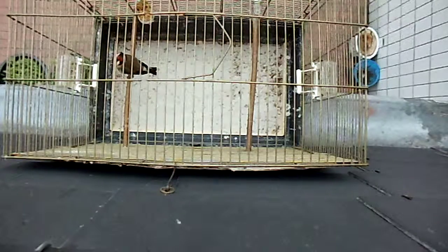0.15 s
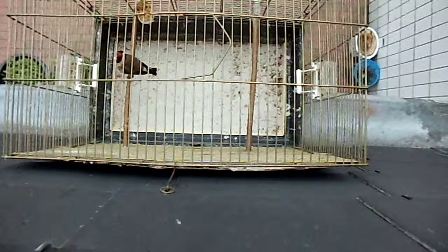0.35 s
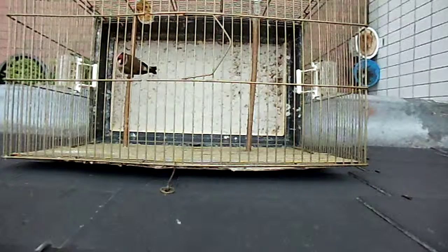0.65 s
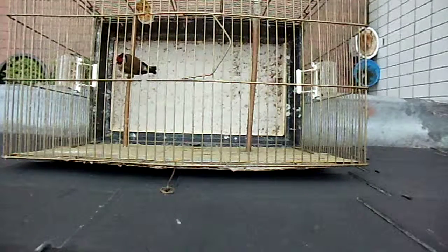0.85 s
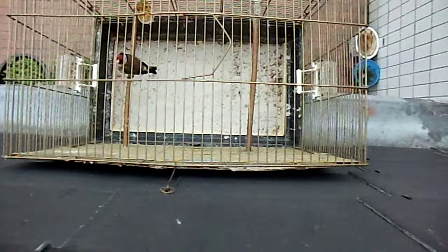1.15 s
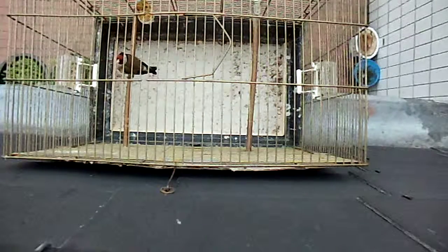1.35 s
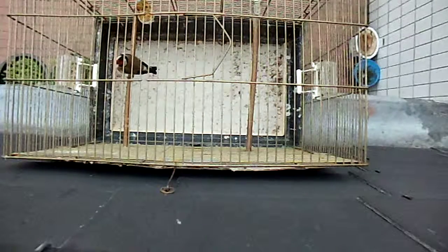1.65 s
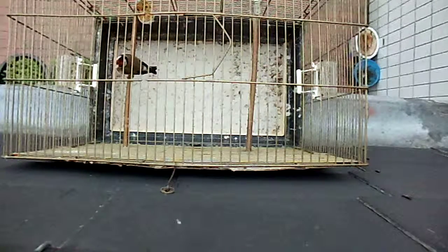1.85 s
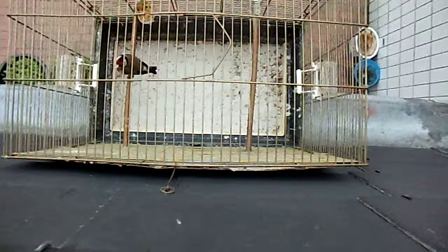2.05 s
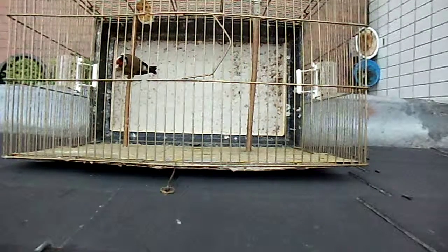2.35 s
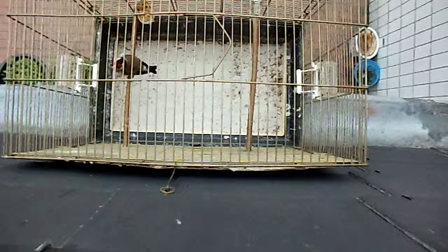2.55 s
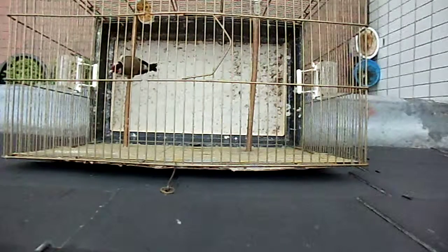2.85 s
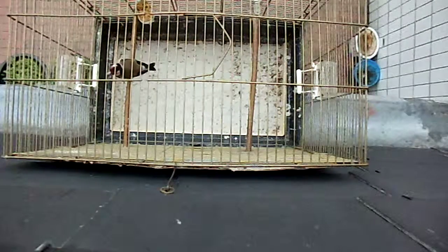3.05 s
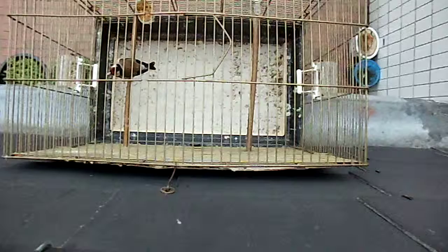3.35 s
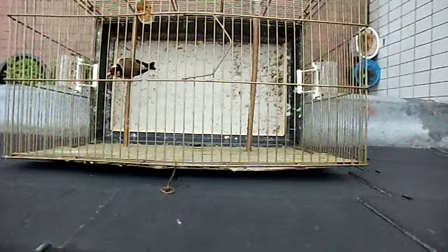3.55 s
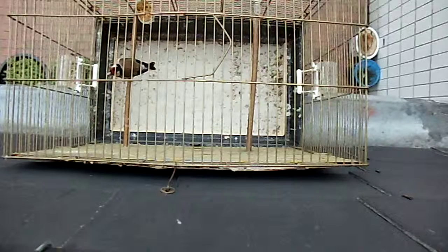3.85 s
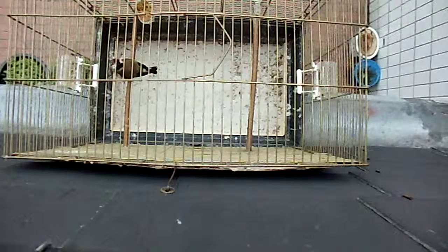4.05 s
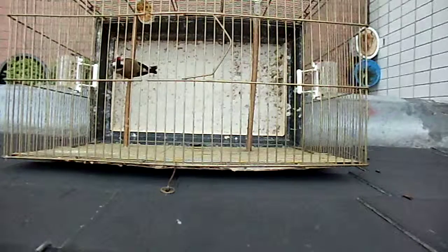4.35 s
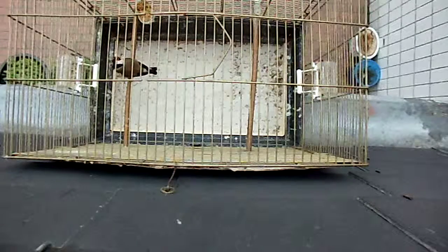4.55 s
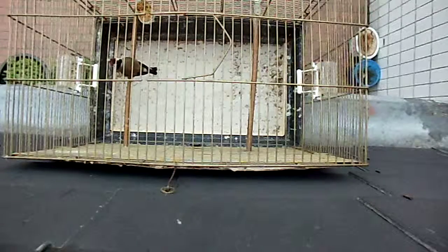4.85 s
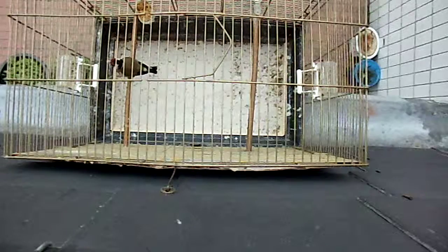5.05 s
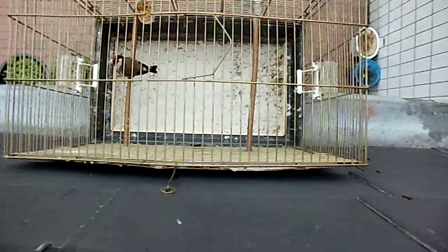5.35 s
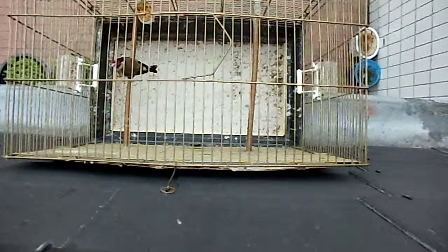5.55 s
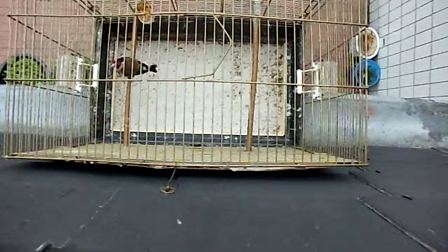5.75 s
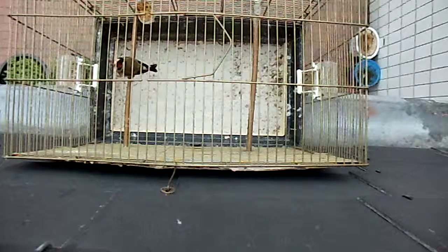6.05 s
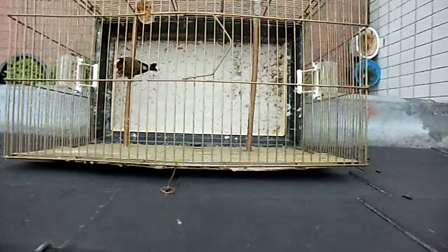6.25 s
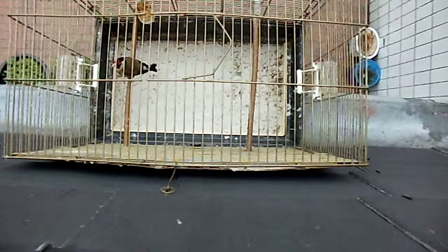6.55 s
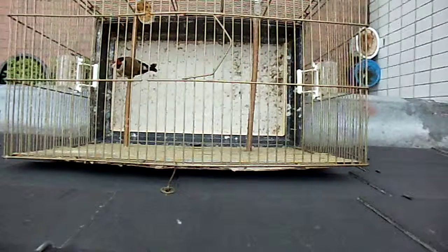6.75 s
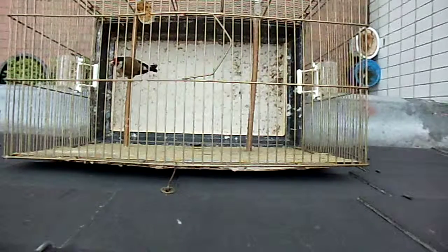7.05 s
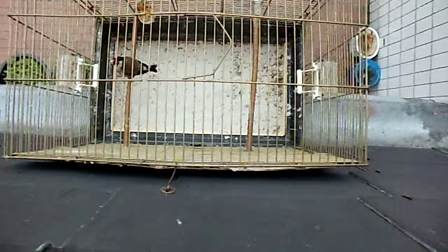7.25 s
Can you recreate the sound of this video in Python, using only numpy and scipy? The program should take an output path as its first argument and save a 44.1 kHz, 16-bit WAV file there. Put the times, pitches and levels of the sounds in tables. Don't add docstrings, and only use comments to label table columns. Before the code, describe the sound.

A caged finch sings falling whistled slides, pauses, then a rapid twittering phrase, more slides, a warble and a trill over distant traffic rumble.

```python
import sys
import numpy as np
from scipy import signal
from scipy.fft import rfft, irfft, next_fast_len
from scipy.io import wavfile
from scipy.ndimage import uniform_filter1d

SR = 44100
rng = np.random.default_rng(int(sys.argv[2]) if len(sys.argv) > 2 else 0)


def file_out(sig):
    cols = np.atleast_2d(sig).T
    lim = np.clip(cols, -1, 1)
    pcm = np.round(lim * 32767).astype(np.int16)
    wavfile.write(sys.argv[1], SR, pcm)


def rack_gain(trim_db):
    fader = np.asarray(trim_db, float)
    return 10 ** (fader / 20)


N = 325891


def evened(x):
    return x / np.sqrt(np.mean(x ** 2) + 1e-20)


def read(points, hz):
    f, value = np.transpose(points)
    return np.interp(np.log(hz + 1), np.log(f + 1), value)


def coloured(x, points):
    size = next_fast_len(len(x))
    gain = rack_gain(read(points, np.fft.rfftfreq(size, 1 / SR)))
    return irfft(rfft(x, size) * gain, size)[:len(x)]


def along(rows):
    s, db = np.transpose(rows)
    return rack_gain(np.interp(np.arange(N) / SR, s, db))


def spans(rows, rest):
    out = np.full(N, float(rest))
    for start, end, value in rows:
        out[int(start * SR):int(end * SR)] = value
    return out


def town(patchy_db=1.1, level_db=2.0):
    # (frequency [Hz], density [dB per Hz])
    wash_spectrum = [(35, -47), (60, 4.5), (87, -2.5), (143, -4), (297, -8), (432, -11), (486, -9),
                     (614, -14), (874, -10.5), (1370, -18), (2900, -22), (3500, -28.5), (4320, -29),
                     (15000, -56.5), (16500, -32)]
    # (time [s], level [dB])
    wash_level = [(0.0, -59.5), (1.13, -58.5), (1.6, -60), (2.7, -62), (2.85, -58.5), (3.0, -60.5),
                  (3.2, -60.5), (4.09, -63.5), (4.77, -65.5), (5.62, -64), (7.39, -64.5)]
    frames = N // 256 + 5
    a, b, patches = rng.standard_normal((frames, 513, 3)).T
    patches = uniform_filter1d(patches, size=10, axis=0)
    patches = evened(uniform_filter1d(patches, size=14, axis=1))
    z = (a + 1j * b) * rack_gain(patchy_db * patches)
    wash = signal.istft(z, nperseg=1024, noverlap=768)[1][:N]
    return rack_gain(level_db) * evened(coloured(wash, wash_spectrum)) * along(wash_level)


def rumble():
    # (frequency [Hz], density [dB per Hz])
    throb_spectrum = [(7.1, -37), (12, 3), (18, -3), (24, -4), (48, -4), (60, -25), (86, -18.5),
                      (110, -19.5), (140, -46), (240, -120)]
    # (time [s], level [dB])
    throb_level = [(0.0, -52.5), (0.6, -56.5), (1.5, -59), (2.3, -57), (2.86, -56), (3.21, -53.5),
                   (3.5, -55.5), (5.99, -57.5), (6.24, -58.5), (6.48, -52), (6.8, -61), (7.39, -57)]
    low = evened(coloured(rng.standard_normal(N), throb_spectrum))
    lumps = np.sqrt(uniform_filter1d(low ** 2, size=6000))
    return low / (lumps + 0.33) * rack_gain(4.5) * along(throb_level)


def engine():
    # (time [s], pitch [Hz], level [dB])
    firing = [(3.75, 43.2, -56), (5.472, 42.44, -54.5), (5.66, 43.2, -57), (5.95, 45.44, -80),
              (6.1, 45.84, -53.5), (6.49, 49.6, -49), (6.71, 49.5, -60), (6.96, 53, -55),
              (7.39, 59.4, -57.5)]
    s, hz, db = np.transpose(firing)
    t = np.arange(N) / SR
    fade_in = np.clip((t - s[0]) / 0.12, 0, 1)
    phase = 2 * np.pi * np.cumsum(np.interp(t, s, hz)) / SR
    return np.sqrt(2) * fade_in * rack_gain(np.interp(t, s, db)) * np.sin(phase)


def wobble():
    # (start [s], end [s], wobble [rad])
    unsteady = [(0, .72, .36), (.72, 3.85, .3), (3.87, 3.92, .35), (4.11, 4.14, 1.0), (4.14, 4.32, .16),
                (4.55, 4.6, .2), (4.9, 5.03, .2), (5.03, 5.1, .3), (5.11, 5.19, .06), (5.22, 5.25, .6),
                (5.35, 6.26, .33), (6.43, 6.48, .25), (6.85, 7.39, .07)]
    low_pass = signal.butter(4, 300, fs=SR, output="sos")
    sway = evened(signal.sosfilt(low_pass, rng.standard_normal((2, N))))
    sway = sway * spans(unsteady, .04)
    return np.exp(1j * sway[0] + .8 * np.clip(sway[1], -2, .8))


def add(voice, rows, fade_s=0.0011, round_s=.003):
    # (start [s], end [s], rate [quavers per s], swing [Hz], highest quavering tone [Hz])
    quavers = [
        (5.0289, 5.09, 140, 720, 6900),
        (6.578, 6.615, 110, 60, 9500),
        (6.615, 6.808, 97, 175, 9500),
    ]
    s, hz, db = np.transpose(rows)
    at = np.arange(max(int(s[0] * SR), 0), min(int(s[-1] * SR), N))
    t = at / SR
    hz = uniform_filter1d(np.interp(t, s, hz), int(round_s * SR), mode="nearest")
    for start, end, rate, swing, top in quavers:
        inside = np.clip(np.minimum(t - start, end - t) / 0.0057, 0, 1)
        beat = 2 * np.pi * rate * (t - start)
        quaver = np.sin(beat) - .3 * np.sin(2 * beat) + .2 * np.cos(2 * beat)
        hz = hz + swing * inside * (hz > 4000) * (hz < top) * quaver
    edge = np.clip(np.minimum(t - s[0], s[-1] - t) / fade_s, 0, 1)
    size = np.sqrt(2) * rack_gain(np.interp(t, s, db)) * edge
    turn = np.exp(2j * np.pi * np.cumsum(hz) / SR)
    voice[:, at] += [size * turn, size, size * hz, size * turn ** 2, (size * turn) ** 2]


def far_birds():
    # (start [s], length [s], from [Hz], to [Hz], level [dB])
    calls = [(0.759, 0.019, 3610, 4220, -53.5), (0.896, 0.035, 4370, 4020, -68),
             (1.152, 0.026, 2590, 3190, -59), (1.16, 0.014, 5900, 6100, -71),
             (1.19, 0.034, 4770, 4450, -68.5), (1.268, 0.03, 3200, 3180, -66.5),
             (1.3, .08, 3180, 3200, -72), (1.27, .015, 6150, 6300, -76), (1.21, .025, 4100, 4350, -74),
             (1.25, .035, 4400, 4750, -75), (1.89, .06, 2950, 2900, -76), (1.57, 0.019, 4650, 4800, -77),
             (1.871, 0.019, 2620, 3020, -67.5), (1.179, .075, 3080, 3050, -70),
             (2.37, 0.09, 5250, 4900, -83), (2.96, 0.1, 5350, 5500, -85), (3.275, .05, 5080, 4450, -76),
             (3.505, 0.025, 2530, 2920, -71), (3.525, 0.044, 2900, 2860, -76),
             (3.722, 0.034, 4850, 4400, -69)]
    voice = np.zeros((5, N), complex)
    for s, length, from_hz, to_hz, db in calls:
        middle_hz = .42 * from_hz + .58 * to_hz
        rows = [(s, from_hz, db - 6), (s + length / 2, middle_hz, db), (s + length, to_hz, db + 1)]
        add(voice, rows, fade_s=0.0018)
    return (voice[0] * wobble()).real


def yard(x, onset_s=0.0074):
    # (frequency [Hz], t60 [s])
    decay_time = [(2000, 0.47), (4000, 0.52), (6000, 0.56), (9000, 0.19), (14000, 0.096)]
    # (frequency [Hz], level [dB])
    tail_level = [(2000, -22.5), (3200, -16), (4300, -14), (5200, -16), (6500, -22.5), (7500, -28),
                  (9000, -28), (14000, -36)]
    taps = np.zeros(SR)
    at = np.arange(0, SR - 8, 8) + rng.integers(0, 8, (SR - 1) // 8)
    taps[at] = rng.choice([-1., 1.], at.shape)
    hz, t, z = signal.stft(taps, SR, nperseg=128)
    decay = rack_gain(-60 * t / read(decay_time, hz)[:, None])
    energy = (decay ** 2).sum(1, keepdims=True) * 64 / 8
    decay *= rack_gain(read(tail_level, hz))[:, None] / np.sqrt(energy)
    tail = signal.istft(z * decay, SR, nperseg=128)[1]
    return signal.fftconvolve(x, np.r_[np.zeros(int(onset_s * SR)), tail])[:N]


def near_walls(x, cage=.85, walls=1.35, dull_hz=6300):
    # (delay [ms], gain [ratio])
    echoes = [(0.658, -0.1), (0.726, 0.33), (0.907, 0.16), (1.202, -0.16), (1.406, 0.45), (1.542, -0.16),
              (2.222, -0.24), (2.404, -0.16), (2.812, 0.16), (2.993, 0.1), (3.447, 0.24), (4.082, -0.24),
              (5.011, -0.16), (5.079, 0.1), (6.304, 0.1), (6.689, -0.16), (6.848, 0.1), (8.141, -0.1),
              (8.866, -0.16), (9.478, 0.1), (10.317, -0.16), (10.476, -0.1), (10.726, -0.1), (12.018, 0.1)]
    lean_ms, turns_per_s = .06, .55
    taps = np.zeros((4, 1024))
    taps[0, 0] = 1
    for k, (ms, gain) in enumerate(echoes):
        if ms < 4.5:
            taps[0, round(ms * SR / 1000)] += gain * cage
        else:
            shift = lean_ms * np.sin(2.4 * k + 2.1 * np.arange(3))
            taps[[1, 2, 3], np.round((ms + shift) * SR / 1000).astype(int)] += gain * walls
    taps[1:] = signal.filtfilt(*signal.butter(3, dull_hz, fs=SR), taps[1:])
    head = 2 * np.pi * (turns_per_s * np.arange(N) / SR + np.arange(3)[:, None] / 3)
    share = np.vstack([np.ones(N), np.sqrt(2 / 3) * np.cos(head / 2)])
    heard = signal.oaconvolve(x * share, taps, axes=1).sum(0)[:N]
    return heard / np.linalg.norm(taps[:2])


def tray(x):
    # (frequency [Hz], t60 [s], level [dB])
    modes = [(2920, .09, -39), (3400, 0.16, -7), (3800, 0.09, -27), (4400, 0.2, -6), (4234, 0.1, 8),
             (4650, 0.18, -25), (5080, 0.057, 1.5)]
    t = np.arange(8000) / SR
    ring = np.zeros(8000)
    for hz, t60, db in modes:
        mode_gain = 2 * np.log(1000) / (t60 * SR)
        ring += rack_gain(db - 60 * t / t60) * np.sin(2 * np.pi * hz * t) * mode_gain
    return signal.oaconvolve(x, ring)[:N]


def glide(note, shape, sag):
    start, length, from_hz, to_hz, peak_db = note
    bend, arrive, top, start_db, end_db = shape
    u = np.linspace(0, 1, num=32)
    arrive, top = min(arrive, .999), np.clip(top, .05, .95)
    hz = to_hz + (from_hz - to_hz) * np.clip(1 - u / arrive, 0, 1) ** bend
    hz *= 1 - sag * np.clip(u - arrive, 0, 1)
    swell, fade = start_db * (1 - u / top) ** 2, end_db * ((u - top) / (1 - top)) ** 2
    db = peak_db + np.where(u < top, swell, fade)
    return np.transpose([start + length * u, hz, db])


def winding_notes(voice):
    # (time [s], pitch [Hz], level [dB])
    hook = [(3.953, 2690, -50), (3.965, 2920, -40), (3.978, 3400, -38.5), (3.987, 4880, -33),
            (4.004, 5830, -59)]
    tumble = [(4.236, 8650, -53), (4.241, 7100, -38), (4.246, 7530, -35), (4.252, 7200, -56),
              (4.266, 5170, -47), (4.276, 4710, -35), (4.29, 4310, -52), (4.296, 3800, -30),
              (4.306, 3600, -36)]
    swoop = [(4.6, 6060, -39), (4.615, 6266, -30), (4.636, 5860, -45), (4.654, 5640, -52.5),
             (4.666, 5210, -22.5), (4.69, 5006, -32.5), (4.736, 5050, -48)]
    buzz = [(5.037, 6100, -44), (5.041, 5950, -36), (5.069, 5900, -27.5), (5.087, 5950, -33)]
    buzz_tail = [(5.08, 6950, -40), (5.086, 7050, -34), (5.097, 7250, -36), (5.107, 7900, -54)]
    dive = [(5.117, 4520, -55), (5.129, 4060, -46), (5.133, 3830, -29), (5.148, 3250, -33.5),
            (5.159, 2900, -29.5), (5.165, 2680, -43), (5.189, 2230, -55)]
    lift = [(6.441, 3100, -46), (6.446, 3600, -36), (6.452, 3900, -39), (6.458, 4150, -35),
            (6.465, 4400, -38), (6.47, 4400, -50)]
    clamber = [(4.938, 3300, -46), (4.942, 3850, -36), (4.947, 4350, -33), (4.956, 4700, -34),
               (4.975, 5180, -39), (4.99, 5450, -44), (4.995, 5450, -58)]
    warble = [(6.577, 8800, -54), (6.589, 8370, -43), (6.612, 8450, -41), (6.638, 7570, -34),
              (6.66, 6440, -30.5), (6.7, 6095, -31), (6.76, 5830, -32.5), (6.8, 6103, -27),
              (6.819, 6070, -54)]
    for rows in (hook, tumble, swoop, buzz, buzz_tail, dive, lift, clamber, warble):
        add(voice, rows)


def simple_notes(voice):
    # (start [s], length [s], from [Hz], to [Hz], peak level [dB])
    flicks = [(3.871, 0.033, 2870, 5650, -40), (4.359, 0.022, 5580, 6820, -33.5),
              (4.477, 0.019, 2710, 3220, -31), (4.901, 0.017, 2180, 4000, -39),
              (5.227, 0.033, 2380, 4830, -39.5), (5.227, 0.017, 5000, 7120, -33),
              (5.246, 0.02, 4400, 5400, -39), (6.432, 0.014, 1900, 4500, -41),
              (4.912, .026, 2600, 3400, -46), (4.766, .012, 2150, 2650, -52),
              (5.226, .012, 2000, 3000, -52), (4.143, .02, 2150, 2530, -50),
              (4.197, 0.0184, 4200, 4650, -39.5), (4.774, .022, 2590, 3240, -36.5)]
    climbs = [(3.878, 0.038, 3200, 4800, -66), (4.556, 0.039, 3600, 5540, -32),
              (4.572, 0.048, 4750, 5230, -43), (4.96, 0.04, 4700, 5030, -41.5)]
    swells = [(4.169, .03, 2550, 3070, -35), (4.177, 0.024, 3750, 4000, -40),
              (4.214, 0.026, 4180, 4550, -37), (4.79, .025, 3210, 3950, -30.5)]
    falls = [(4.107, 0.028, 5120, 1810, -41), (4.12, 0.022, 3000, 1450, -52), (4.112, .03, 6000, 3000, -44),
             (4.24, .006, 7500, 5600, -48), (4.256, .022, 3820, 3500, -46), (4.275, .03, 3490, 2770, -38.5),
             (4.858, .03, 6460, 5580, -35), (5.029, .009, 8000, 7100, -53)]
    settles = [(4.009, 0.028, 6520, 6096, -29), (4.078, 0.037, 5500, 5120, -28.5),
               (4.151, 0.013, 3430, 3780, -37), (4.695, 0.025, 4200, 4260, -53),
               (4.92, .022, 6600, 6450, -52), (6.787, .02, 3030, 3220, -49)]
    snaps = [(4.361, 0.069, 4730, 5740, -36), (4.858, 0.05, 8400, 6500, -34.5),
             (5.245, 0.033, 5430, 6340, -28.5)]
    arches = [(6.359, .052, 5000, 6670, -40), (6.353, 0.058, 2800, 5560, -43)]
    # (glide bend [exponent], glide end [share of length], peak [share of length],
    # start level [dB], end level [dB])
    shapes = [
        (1.3, 1, 0.65, -12.5, -16),
        (2.3, 0.94, 0.29, -9.5, -33),
        (1.2, 0.937, 0.74, -16, -16),
        (1.3, 0.96, 0.38, -26, -32),
        (2.84, .999, 0.48, -23, -11),
        (2.6, .5, 0.29, -9.5, -11.5),
        (2, .42, 0.58, -17, -16),
    ]
    sags = [0.012, 0, 0, 0.0058, 0, 0.038, 0.142]
    kinds = (flicks, climbs, swells, falls, settles, snaps, arches)
    for notes, shape, sag in zip(kinds, shapes, sags):
        for note in notes:
            add(voice, glide(note, shape, sag))


def finch():
    # (time [s], pitch [Hz], level [dB])
    slide = [
        [(.002, 6100, -41.5), (.006, 7440, -30.5), (.012, 9600, -39)],
        [(.013, 6950, -52), (.026, 6220, -32.5), (.04, 5180, -32), (.05, 4574, -29.5), (.07, 3964, -29.5),
         (.096, 3240, -32.5), (.116, 2760, -35.5), (.128, 2440, -48.5), (.146, 2270, -58)],
    ]
    trill = [
        [(.005, 4240, -53), (.0102, 3910, -41.5), (.0122, 3795, -31), (.019, 3290, -37.5), (.025, 3013, -32.5),
         (.029, 2910, -44)],
        [(.034, 4490, -49), (.039, 4780, -33), (.052, 5353, -32), (.055, 5420, -50)],
    ]
    # (start [s], effort [dB], length [factor], pitch [factor])
    slide_times = [(-.032, -3, 1.02, 1.003), (.169, -3.5, 1.054, 0.97), (0.376, -3, 0.95, 1.002),
                   (.564, -3.5, 0.98, 0.98), (5.333, -2.5, 1.006, 1), (5.528, -3, 0.96, 0.99),
                   (5.716, -3, 1.0, 0.99), (5.914, -3, 0.98, 0.99), (6.107, -4, 1.026, 0.99)]
    trill_times = [(6.8612, -0.93, 0.86, 0.99), (6.931, -0.75, 0.95, 1), (7.0026, -0.097, 0.92, .99),
                   (7.0723, -.3, 0.95, 0.98), (7.1441, -.2, 0.9, 0.98), (7.216, -0.41, 0.96, 0.99),
                   (7.2899, 0.61, 0.89, .99), (7.361, 2.3, 1, 1)]
    # (multiple of the pitch, level [dB])
    partials = [(2, -15), (3, -24), (4, -30.5), (5, -45)]
    # (frequency [Hz], level [dB])
    beak = [(4000, -15), (7000, -11.5), (9000, -7), (11500, 3), (14000, -0.5), (16500, -14), (19000, -71)]
    # (start [s], end [s], lift [dB])
    gape = [(0, .72, 6), (3.87, 3.92, 10), (4.005, 4.05, -7.5), (4.105, 4.14, 0), (4.55, 4.6, -4),
            (4.6, 4.66, 2.5), (4.66, 4.82, -2.5), (4.85, 4.885, 8), (4.885, 4.9, -6), (4.9, 5.02, 3),
            (5.02, 5.11, 1.5), (5.11, 5.19, 5), (5.22, 5.243, 3), (5.243, 5.3, 5), (5.3, 6.26, 5.5),
            (6.35, 6.42, 14), (6.43, 6.48, 4.5), (6.57, 6.83, -3.5)]
    trill_gape_s, trill_gape_db = 0.032, 3
    sum_tone = .3

    voice = np.zeros((5, N), complex)
    winding_notes(voice)
    simple_notes(voice)
    for syllable, times in ((slide, slide_times), (trill, trill_times)):
        for s, effort_db, length, pitch in times:
            for rows in syllable:
                add(voice, np.array(rows) * [length, pitch, 1] + [s, 0, effort_db])

    size = voice[1].real + 1e-9
    unit, hz = voice[0] / size, voice[2].real / size
    trill_gapes = [(row[0], row[0] + trill_gape_s, trill_gape_db) for row in trill_times]
    gape_db = spans(list(gape) + trill_gapes, 0)
    octave = voice[3] / size + sum_tone * (unit ** 2 - voice[4] / size ** 2)
    sway = wobble()
    turn = sway / abs(sway)
    overtones = np.zeros(N, complex)
    for k, db in partials:
        tone = octave if k == 2 else unit ** round(k)
        audible = np.clip((20000 - k * hz) / 2000, 0, 1)
        overtones += rack_gain(db) * tone * turn ** (round(k) - 1) * audible
    fundamental = (size * unit * sway).real
    return fundamental + coloured((size * rack_gain(gape_db) * overtones * sway).real, beak)


def scene():
    bird, far = finch(), far_birds()
    far_wet = rack_gain(11)
    background = town() + rumble() + engine()
    song = near_walls(bird) + tray(bird) + yard(bird + far_wet * far)
    return (song + far + background)[None]


def top_cut(x):
    return signal.sosfilt(signal.butter(12, 16640, fs=SR, output="sos"), x)


def record(dry):
    # (frequency [Hz], level [dB])
    hiss_spectrum = [(100, -13.5), (1000, -18.5), (4000, -17), (9000, -17), (16000, -16.5)]
    self_db, offset, edge_hz = -73.5, .0067, 15950
    treble = np.diff(dry[0], prepend=0)
    step = np.sqrt(abs(uniform_filter1d(treble ** 2, size=100)))
    hiss = coloured(rng.standard_normal(N), hiss_spectrum) * step
    hiss += rack_gain(self_db) * rng.standard_normal(N)
    edge = signal.firwin(511, edge_hz, window=("kaiser", 9), fs=SR)
    mix = signal.oaconvolve(dry + hiss, edge[None], "same") + offset
    return top_cut(mix)


dry = scene()
out = record(dry)
file_out(out)
```